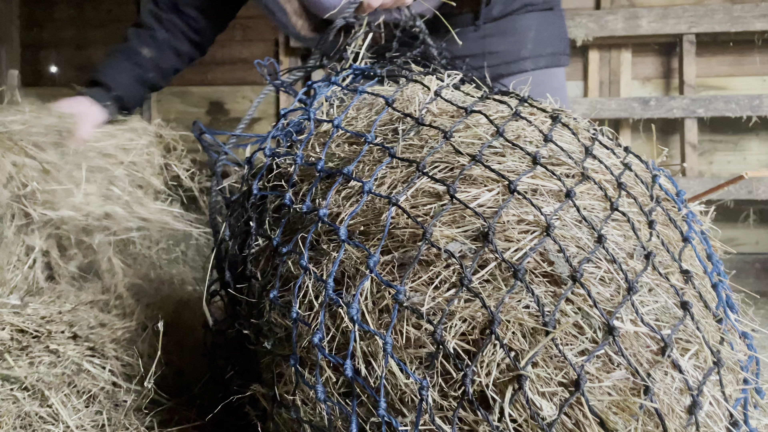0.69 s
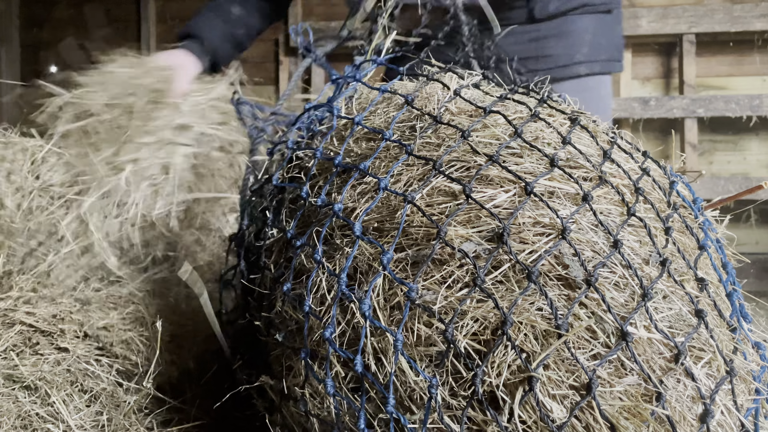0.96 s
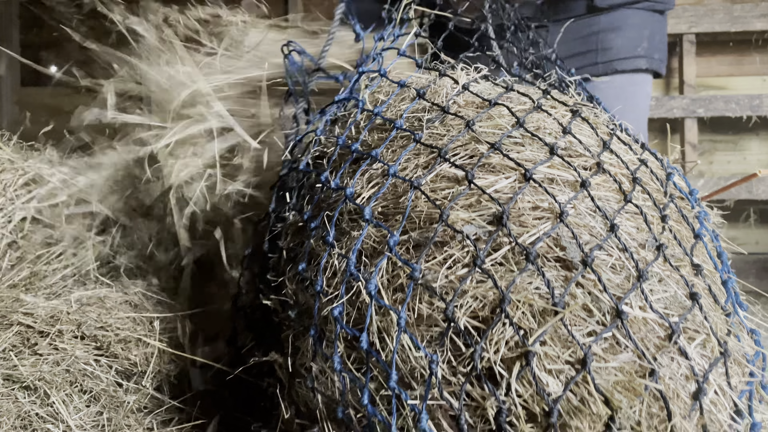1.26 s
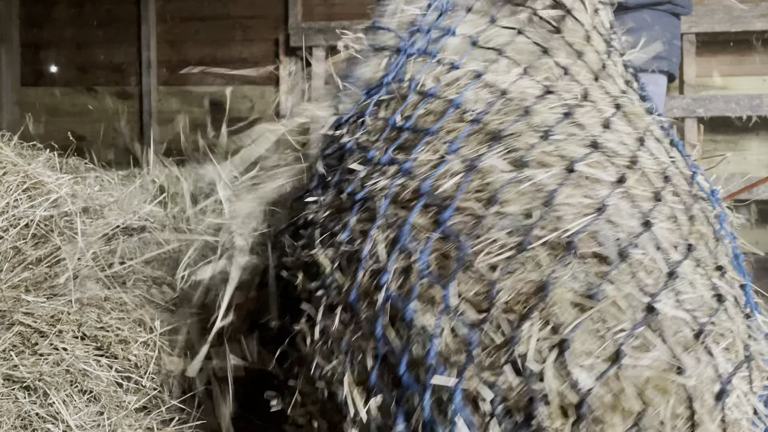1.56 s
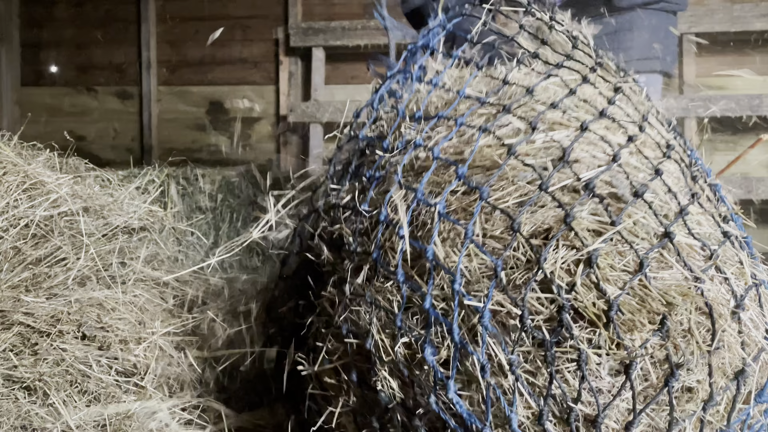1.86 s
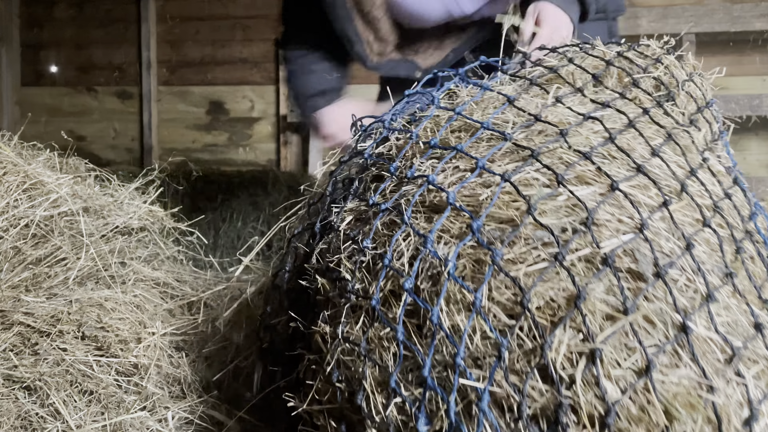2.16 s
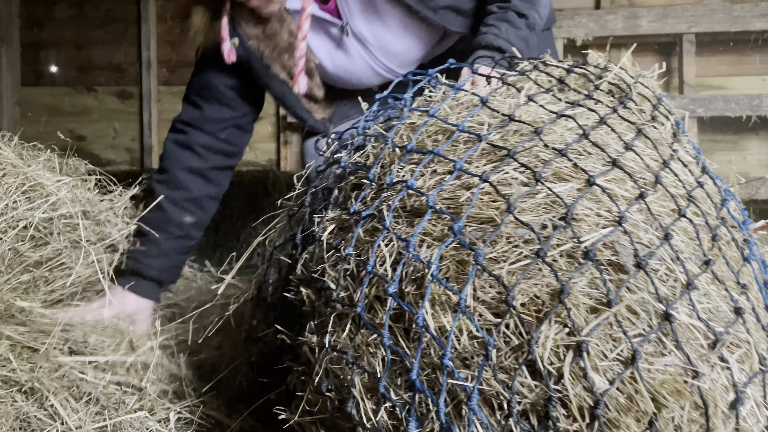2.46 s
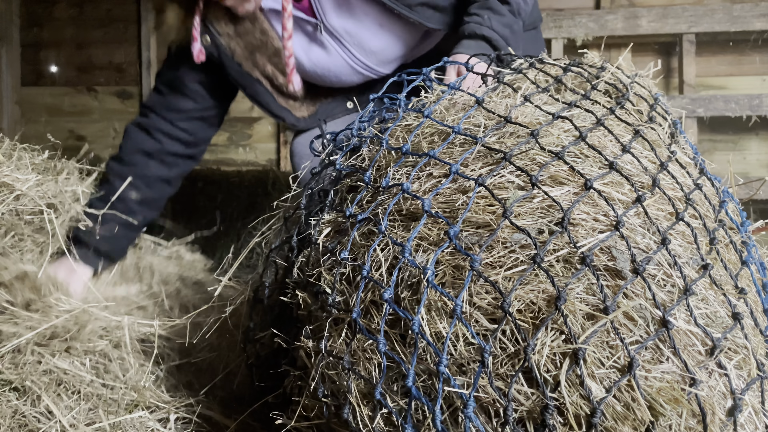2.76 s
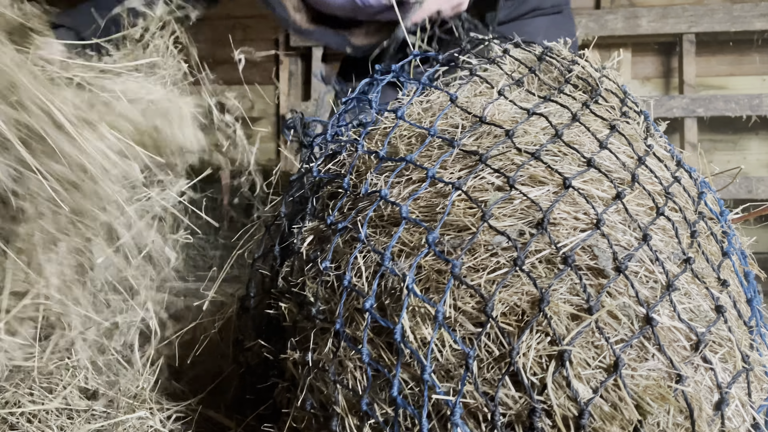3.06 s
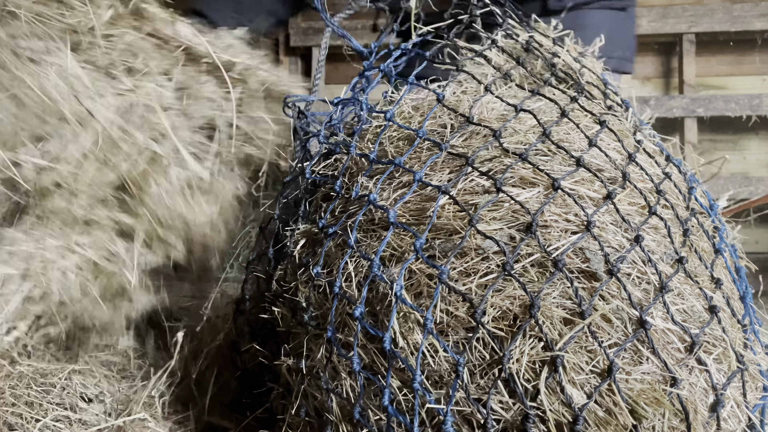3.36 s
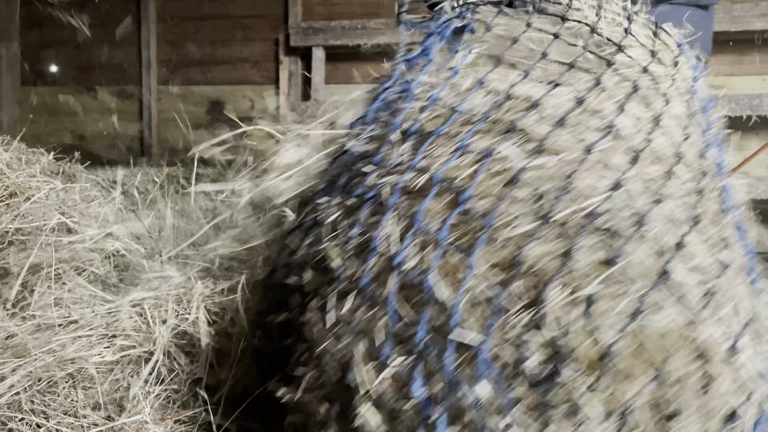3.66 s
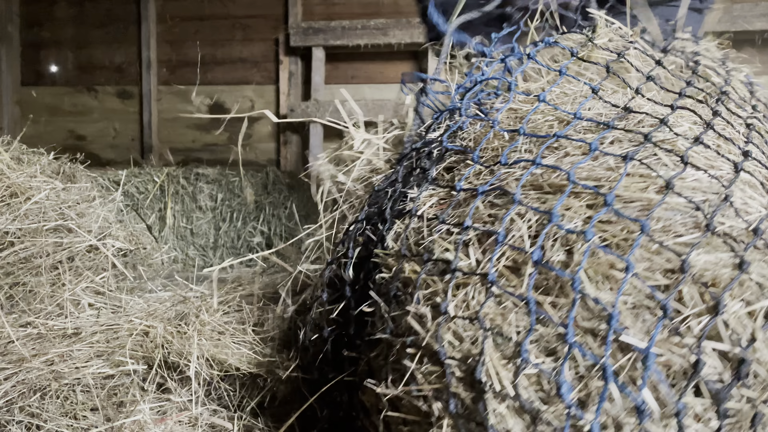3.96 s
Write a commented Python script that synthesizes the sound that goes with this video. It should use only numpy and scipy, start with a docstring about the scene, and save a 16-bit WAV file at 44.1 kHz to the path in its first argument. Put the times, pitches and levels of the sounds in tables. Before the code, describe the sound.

Crackling dry hay is pulled from a pile and packed into a net in a barn.

```python
"""In a barn, dry hay is pulled from a pile and stuffed into a net, twice. Countless stalks slide and crackle
and a few stems snap; the packed net adds a duller crunch. Heaved bundles thud, hand and net bump, and a boot
scuffs the floor once with a squeak as the net is shifted. Underneath lie a low rumble, a hum and a far drone
that dies away. The wooden walls add a short tail, and a closely spaced pair of microphones listens."""
import sys
import numpy as np
from scipy import signal
from scipy.fft import rfft, irfft
from scipy.io import wavfile

SR = 44100
rng = np.random.default_rng(int(sys.argv[2]) if len(sys.argv) > 2 else 0)


def master(y):
    """Save y as 16-bit WAV."""
    cut = np.clip(np.atleast_2d(y).T, -1, 1)
    pcm = np.round(cut * 32767)  # scale
    wavfile.write(sys.argv[1], SR, pcm.astype(np.int16))


N = 176400
T = np.arange(N) / SR
HZ = np.maximum(np.arange(N // 2 + 1) * SR / N, 1)

# tone of each layer: frequency_hz, gain_db
RUMBLE_COLOUR = [(20, -34), (33, -33), (45, -9), (59, -2), (75, -6.5), (110, -5.5), (165, -11), (230, -20),
                 (350, -22), (600, -33), (1000, -29), (1500, -37), (3000, -42.5), (15000, -42)]
DRONE_COLOUR = [(100, -21), (190, 0), (320, 0.5), (420, -4), (560, -35), (1500, -32)]
THUD_COLOUR = [(25, -29), (45, -5), (58, 9), (80, 0.5), (120, -19), (250, -16), (800, -63)]
BUMP_COLOUR = [(100, -23), (300, -6.5), (700, 0), (1100, 0.5), (1600, -10.5), (3000, -6.5), (8000, -15)]
CRUNCH_COLOUR = [(150, -7), (400, -4), (650, -4.5), (950, -1), (1400, -7.5), (2500, -6.5), (4000, -10),
                 (9000, -41)]
STALK_COLOUR = [(300, -13), (900, -10.5), (2000, -9.5), (3000, -1.7), (4100, -3), (5200, -.3), (6100, -1),
                (7000, 1.9), (9700, 0.9), (11200, -0.5), (13000, -3.5), (15500, 0)]
# resonances of the barn and of the scuff: pitch_hz, width_hz, gain_db
BARN_MODES = [(340, 9.2, 2), (481, 32, 3.5), (655, 68, 3.5), (932, 106, 3.5), (1226, 64, 5),
              (1503, 66, 4.5), (1800, 270, 2.5)]
SCUFF_MODES = [(390, 130, -2), (608, 59, -3), (1050, 110, -2), (1196, 65, -0.5), (1675, 75, -1),
               (1950, 55, -10), (2520, 140, -16)]
# heaves of the bundles, and a boot's two jerks on the floor: centre_s, half_length_s, level_db
THUDS = [(1.01, 0.073, -43.5), (1.45, 0.082, -42), (2.92, 0.04, -43), (3.17, 0.096, -47.5)]
SCUFF_JERKS = [(1.865, 0.016, -47.5), (1.911, 0.021, -49)]
# bumps of hand and net: start_s, level_db
BUMPS = [(0.301, -52.5), (2.618, -49.5), (3.315, -58), (3.451, -56)]
# bend of the squeak on the scuff: time_s, pitch_hz
SQUEAK_BEND = [(1.85, 1745), (1.885, 1685), (1.925, 1748)]
# single stems breaking: start_s, peak_db, pitch_hz, width_hz
SNAPS = [(0.144, -43, 10500, 4950), (1.023, -33.5, 9400, 3000), (1.264, -35, 9550, 3020),
         (2.294, -35.5, 9600, 7000), (3.6423, -18, 9400, 1100)]
# envelope of the packed bundle's crunch: time_s, level_db
CRUNCH_ENVELOPE = [(0, -64), (.25, -76.5), (.58, -59), (.8, -73), (1.28, -71), (1.47, -52.5), (1.67, -63),
                   (1.82, -56.5), (2.0, -56.5), (2.25, -72.5), (2.55, -64), (2.9, -70), (3.35, -75),
                   (3.52, -61), (3.61, -51.5), (3.75, -52), (3.81, -58), (4, -64.5)]
# how hard the hay is worked in each move: time_s, level_db
FIRST_PULL = [(0, -69.5), (.15, -72), (.2, -59), (.3, -56), (.35, -59.5), (.5, -49), (.72, -52.5),
              (.765, -47.5), (.8, -45.5), (.84, -51), (.94, -52), (1.0, -48), (1.2, -56)]
FIRST_STUFFING = [(1.27, -49), (1.345, -43), (1.405, -46), (1.455, -43.7), (1.495, -46.5), (1.56, -40.5),
                  (1.61, -48), (1.645, -44), (1.69, -47), (1.751, -41), (1.791, -41.5), (1.9, -55),
                  (1.99, -52.5), (2.1, -64), (2.3, -65)]
SECOND_PULL = [(2.37, -62.5), (2.5, -56.5), (2.67, -53.5), (2.77, -57), (2.88, -48), (2.96, -49.5),
               (3.15, -51), (3.4, -56), (3.5, -52)]
SECOND_STUFFING = [(3.571, -42), (3.63, -39.5), (3.69, -41.5), (3.751, -42), (3.795, -54), (3.94, -50.5),
                   (4, -55)]
# how alike the two microphones sound (capped at 0.99 in use): frequency_hz, likeness
MIC_LIKENESS = [(60, 1.2), (160, 0.78), (350, 0.37), (700, 0.24), (1500, 0.05), (2450, 0.76), (3500, 0.25),
                (4600, 0.86), (6000, 0.47), (7000, 1.13), (8800, 2), (11000, 0.5), (12800, 11),
                (14300, 1.5)]
# phase between the microphones: frequency_hz, left_lead_rad
MIC_PHASE = [(5500, 0), (6600, -2.7), (7300, -3.14), (9000, -4.4), (10900, -6.28), (12800, -7.9),
             (14400, -9.42), (15800, -10.3)]
# stereo balance: frequency_hz, left_minus_right_db
MIC_BALANCE = [(60, -2), (500, -0.5), (1700, 0.5), (3400, 3.3), (4600, 0.9), (6100, 3.3), (6900, -0.5)]

RUMBLE_DB, RUMBLE_FADE_DB_PER_S = -48, .5
HUM_HZ, HUM_DB = 59.44, -56
DRONE_DB, DRONE_FADE_START_S, DRONE_FADE_END_S = -56, .79, 1.55
BARN_T60_S, HAY_WET_DB, SCUFF_WET_DB = .75, -10.5, -5
BUMP_ATTACK_S, BUMP_DECAY_S, SNAP_DECAY_S = .0029, .03, .0008
SQUEAK_DB, SQUEAK_WAVER = -6.5, .018   # relative to the scrape; share of the pitch
CRUNCH_DB, CRUNCHES_PER_S, CRUNCH_SPREAD_DB, CRUNCH_RING_S = 1.5, 2500, .5, .0088
STALK_DB, STALKS_PER_S, STALK_SPREAD_DB, STALK_RING_S = 4, 7000, 1, .0025
DENSITY_FOLLOWS_EFFORT, SLIDE_DB = .4, 2.5   # sliding hiss is relative to the crackle
CLUMP_DB, CLUMP_RATE_HZ = 1.13, 8.4


def from_db(db):
    """Decibels to gain."""
    return 10 ** (np.asarray(db) / 20)


def unit_rms(x):
    """Scale to unit rms."""
    return x / np.sqrt(np.mean(x ** 2) + 1e-20)


def in_time(rows):
    """A control curve at every sample."""
    return np.interp(T, *np.transpose(rows))


def at_hz(points):
    """A table read on a log-frequency axis."""
    hz, value = np.transpose(points)
    return np.interp(np.log(HZ), np.log(hz), value)


def colour(x, spectrum):
    """Equalise a sound and bring it to unit rms."""
    return unit_rms(irfft(rfft(x) * from_db(at_hz(spectrum)), N))


def drift(rate_hz):
    """A random wobble of unit rms, mostly slower than rate_hz."""
    return unit_rms(irfft(rfft(rng.standard_normal(N)) / (1 + (HZ / rate_hz) ** 2), N))


def swells(rows):
    """Bell-shaped rises and falls of level."""
    return sum(from_db(db) * np.exp(-((T - centre_s) / half_s) ** 2) for centre_s, half_s, db in rows)


def resonate(x, hz, width_hz):
    """A resonance with gain 1 at its peak."""
    radius = np.exp(-np.pi * width_hz / SR)
    feedback = [1, -2 * radius * np.cos(2 * np.pi * hz / SR), radius ** 2]
    return signal.lfilter(np.array([1, 0, -1]) * (1 - radius ** 2) / 2, feedback, x + 1e-18)


def clicks(per_s, spread_db):
    """Two unrelated trains of random clicks, mostly small, a few larger."""
    sizes = from_db(spread_db * np.minimum(rng.exponential(1, (2, N)), 5))
    return sizes * rng.choice([-1, 1], (2, N)) * (rng.random((2, N)) < per_s / SR)


def crackle(train, low_hz, high_hz, ring_s, stalks=20):
    """Each click rings briefly in one of many stalks of different pitch."""
    struck = rng.integers(0, stalks, N)
    width_hz = np.log(1000) / (np.pi * ring_s)
    pitches = np.linspace(low_hz, high_hz, stalks)
    return sum(resonate(train * (struck == k), hz, width_hz) for k, hz in enumerate(pitches))


def room_tone():
    """The bed: the barn's slowly easing rumble, a low hum and a far drone that fades out."""
    rumble_gain = from_db(RUMBLE_DB - RUMBLE_FADE_DB_PER_S * (T - T.mean()))
    rumble = rumble_gain * colour(rng.standard_normal((2, N)), RUMBLE_COLOUR)
    drone = from_db(DRONE_DB) * colour(rng.standard_normal((2, N)), DRONE_COLOUR)
    hum = from_db(HUM_DB) * unit_rms(np.sin(2 * np.pi * HUM_HZ * T + drift(rate_hz=1)))
    return rumble + hum + drone * np.interp(T, [DRONE_FADE_START_S, DRONE_FADE_END_S], [1, 0])


def barn_reverb(x, wet_db):
    """The wooden walls add a short diffuse tail after a 5 ms pre-delay."""
    t = T[:SR // 2]
    tail = rng.standard_normal((2, len(t))) * from_db(-60 * t / BARN_T60_S) * (t > .005)
    tail /= np.sqrt(np.sum(tail ** 2, axis=1, keepdims=True))
    return x + from_db(wet_db) * signal.fftconvolve(x, tail, axes=1)[:, :N]


def microphones(mid_side):
    """The close pair turns mid (row 0) and side (row 1) into left and right, band by band."""
    mid, side = rfft(mid_side)
    likeness = np.clip(at_hz(MIC_LIKENESS), -.99, .99)
    sign = np.array([[1], [-1]])   # left, right
    stereo = np.sqrt((1 + likeness) / 2) * mid + sign * np.sqrt((1 - likeness) / 2) * side
    balance = from_db(sign * at_hz(MIC_BALANCE) / 2)
    phase = np.exp(.5j * sign * at_hz(MIC_PHASE))
    return irfft(stereo * balance * phase, N)


def handling():
    """Heaved bundles thud softly; hand and net bump with a short dull rustle."""
    thuds = colour(rng.standard_normal((2, N)), THUD_COLOUR) * swells(THUDS)
    rustle = colour(clicks(CRUNCHES_PER_S, CRUNCH_SPREAD_DB), BUMP_COLOUR)
    envelope = np.zeros(N)
    for start_s, db in BUMPS:
        age_s = np.maximum(T - start_s, 0)
        envelope += from_db(db) * np.minimum(age_s / BUMP_ATTACK_S, 1) * np.exp(-age_s / BUMP_DECAY_S)
    return thuds + envelope * rustle


def boot_scuff():
    """A boot scuffs the floor: uneven slips excite a few resonances and lock into a rough squeak."""
    slips = clicks(per_s=1800, spread_db=4)
    scrape = unit_rms(sum(from_db(db) * resonate(slips, hz, width) for hz, width, db in SCUFF_MODES))
    pitch_hz = in_time(SQUEAK_BEND) * (1 + SQUEAK_WAVER * drift(rate_hz=164))
    tone = np.sin(2 * np.pi * np.cumsum(pitch_hz) / SR)
    squeak = unit_rms(np.outer([1, 0], tone))   # mid only
    return (scrape + from_db(SQUEAK_DB) * squeak) * swells(SCUFF_JERKS)


def stem_snaps():
    """A breaking stem gives a bright tick about a millisecond long, sharp or slightly ringing."""
    ticks = np.zeros((2, N))
    t = T[:SR // 100]
    for start_s, peak_db, hz, width_hz in SNAPS:
        burst = rng.standard_normal(len(t)) * np.exp(-t / SNAP_DECAY_S)
        tick = resonate(burst, hz, width_hz)
        start = int(start_s * SR)
        ticks[0, start:start + len(t)] += from_db(peak_db) * tick / np.abs(tick).max()   # mid only
    return ticks


def packed_hay():
    """The squeezed bundle crunches lower than loose hay and rings a little longer."""
    train = clicks(CRUNCHES_PER_S, CRUNCH_SPREAD_DB)
    grains = crackle(train, low_hz=233, high_hz=4490, ring_s=CRUNCH_RING_S)
    return colour(grains, CRUNCH_COLOUR) * from_db(CRUNCH_DB + in_time(CRUNCH_ENVELOPE))


def loose_hay():
    """Stalks crackle and slide in uneven clumps; more effort makes them louder and denser."""
    effort_db = in_time(FIRST_PULL + FIRST_STUFFING + SECOND_PULL + SECOND_STUFFING)
    density = from_db(DENSITY_FOLLOWS_EFFORT * (effort_db - effort_db.mean()))
    train = clicks(STALKS_PER_S * density, STALK_SPREAD_DB) / np.sqrt(density)   # power stays even
    grains = crackle(train, low_hz=830, high_hz=15400, ring_s=STALK_RING_S)
    slide = from_db(SLIDE_DB) * rng.standard_normal((2, N))
    clumps_db = CLUMP_DB * drift(CLUMP_RATE_HZ)
    return colour(unit_rms(grains) + slide, STALK_COLOUR) * from_db(STALK_DB + effort_db + clumps_db)


def scene():
    """Hay, scuff and room tone, tinted by the barn's resonances, at the microphones."""
    hay = barn_reverb(loose_hay() + packed_hay() + stem_snaps() + handling(), HAY_WET_DB)
    mix = hay + barn_reverb(boot_scuff(), SCUFF_WET_DB) + room_tone()
    barn_ring = sum((from_db(db) - 1) * resonate(mix, hz, width) for hz, width, db in BARN_MODES)
    return microphones(mix + barn_ring)


def record(dry):
    """A steep low-pass takes off the top above 15.9 kHz."""
    return signal.sosfiltfilt(signal.ellip(10, .05, 60, 15900, fs=SR, output="sos"), dry)


dry = scene()
out = record(dry)
master(out)
```